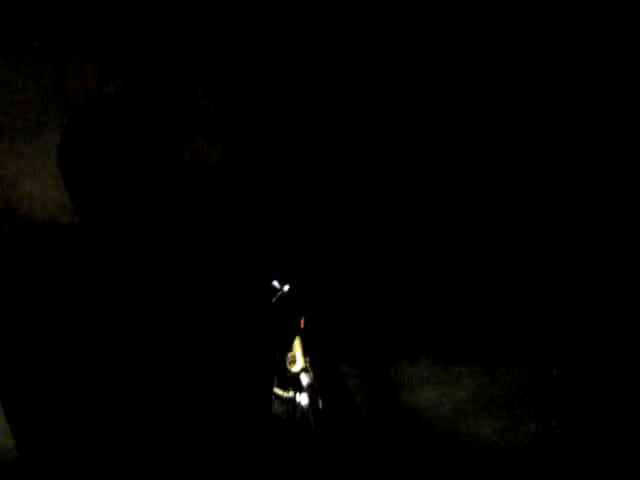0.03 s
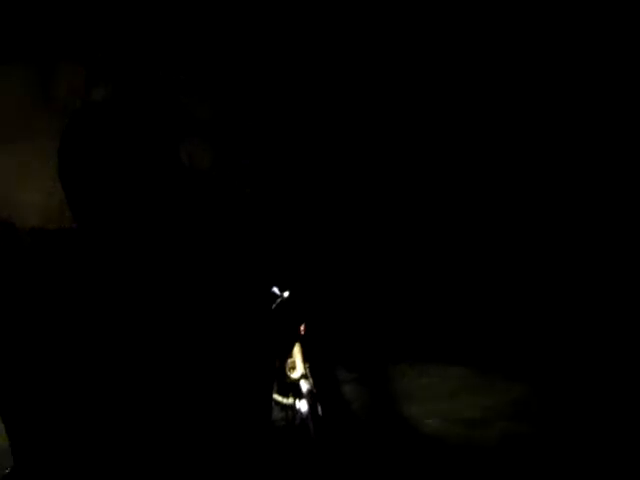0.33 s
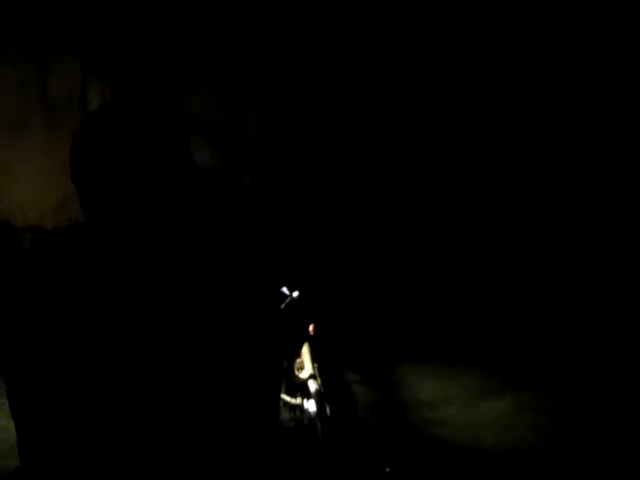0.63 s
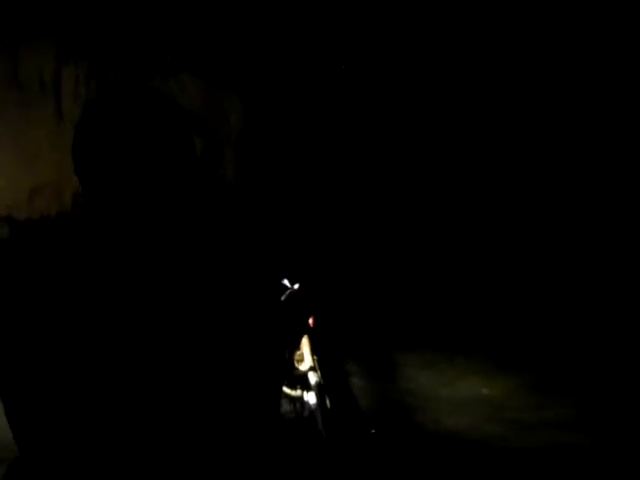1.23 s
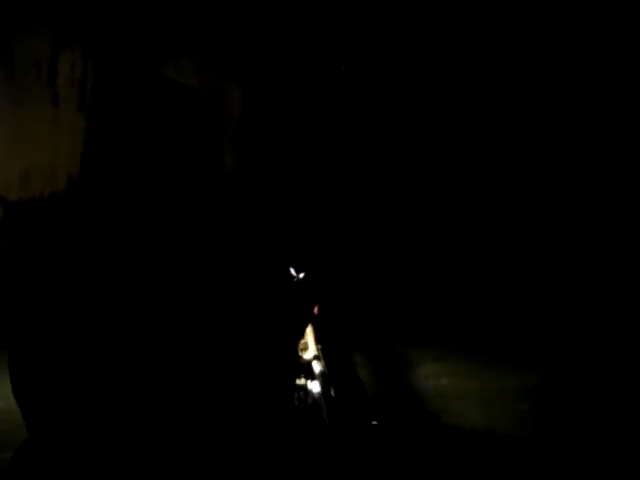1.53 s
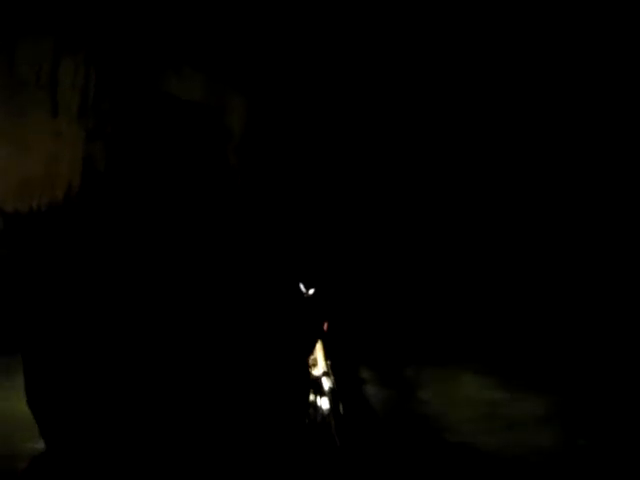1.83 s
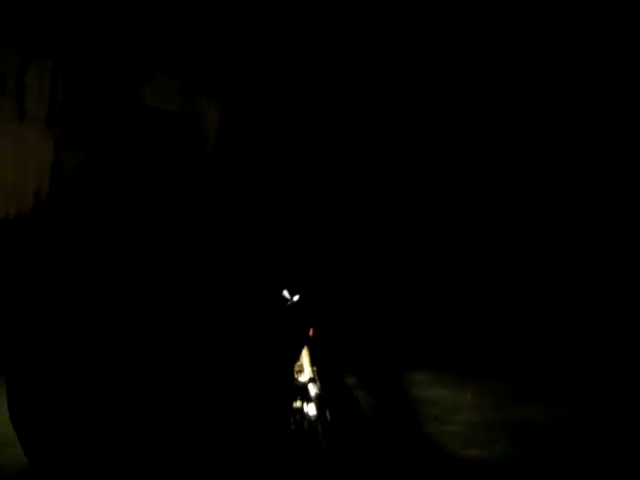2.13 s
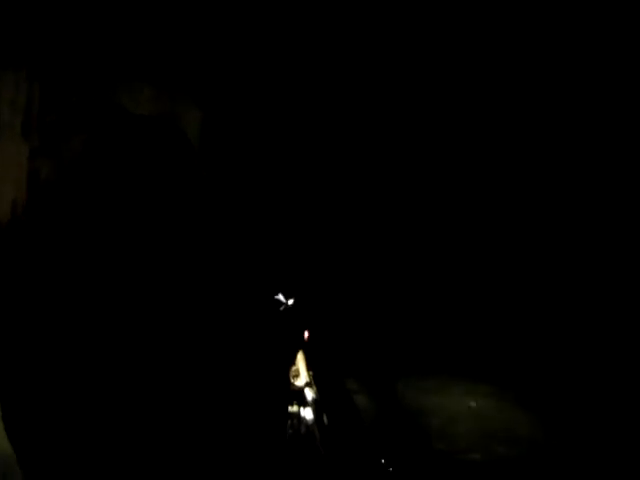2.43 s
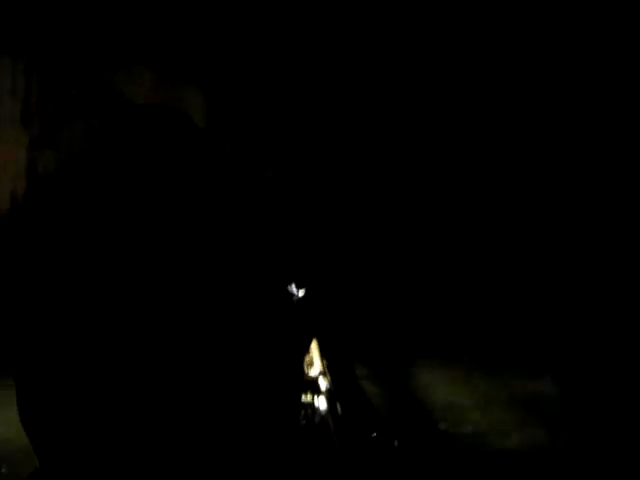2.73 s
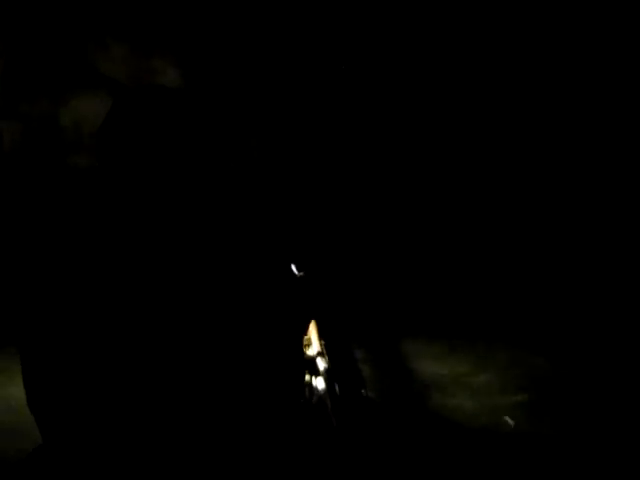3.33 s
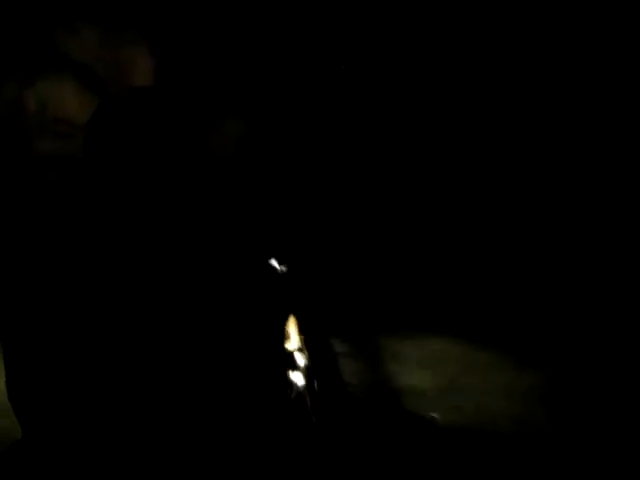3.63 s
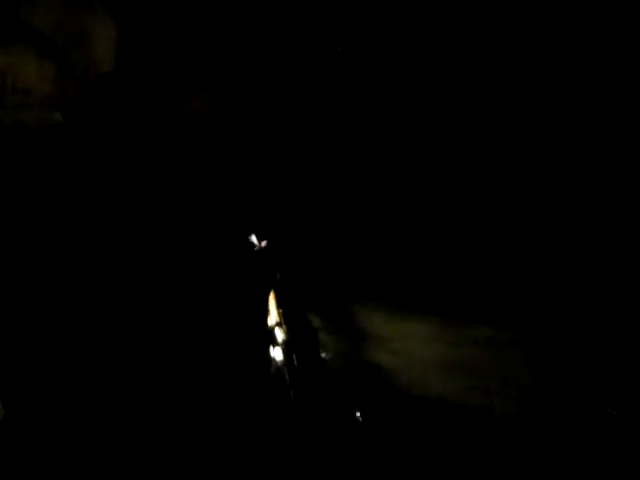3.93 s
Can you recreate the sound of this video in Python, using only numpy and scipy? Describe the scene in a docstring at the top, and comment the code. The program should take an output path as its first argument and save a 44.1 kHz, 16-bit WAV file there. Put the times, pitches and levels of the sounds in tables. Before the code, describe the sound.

Bats squeaking and chattering over a steady rush of water in an echoing cave.

```python
"""Inside a cave a steady rush, like running water, echoes off the rock while a colony of bats squeaks and chatters.
Wings flutter close to the microphone early on, a few drips tick on stone, and a hollow tone sinks near the end.
The mono recorder has a narrow notch in the treble and ducks its gain under the loudest squeaks."""
import sys
import numpy as np
from scipy import signal
from scipy.fft import rfft, irfft, next_fast_len
from scipy.io import wavfile
from scipy.ndimage import uniform_filter1d, map_coordinates

SR = 44100
rng = np.random.default_rng(int(sys.argv[2]) if len(sys.argv) > 2 else 0)


def waveform_to_disk(signal):
    """Save audio, clipped to [-1, 1], as 16-bit WAV at the path in sys.argv[1]."""
    frames = np.transpose(np.atleast_2d(signal))
    scaled = np.clip(frames, -1, 1) * 32767
    samples = np.round(scaled).astype(np.int16)
    wavfile.write(sys.argv[1], SR, samples)


N = 176400

# bat squeaks (s, length s, first pitch Hz, last pitch Hz, level dB, overtone dB, rasp 0-1)
SQUEAKS = [
    (0.265, 0.047, 7980, 9350, -21, -4.5, 0.6), (0.273, 0.026, 10400, 10800, -26, -23, 0.5),
    (0.408, 0.11, 5770, 5780, -25, -16, 0.39), (.487, .06, 9430, 9900, -27, -25, 0.6),
    (0.685, 0.079, 6350, 7270, -25, -9, 0.56), (0.702, 0.053, 15100, 13600, -28.5, -30, .55),
    (0.772, 0.036, 13900, 14100, -22.5, -30, .05), (0.83, 0.065, 10500, 10500, -24.5, -17, 0.4),
    (0.917, .066, 6480, 6400, -26.5, -12, 0.53), (.953, 0.033, 8400, 8700, -25, -25, .2),
    (.977, 0.042, 10050, 10500, -22.5, -28, 0.3), (1.031, 0.043, 7640, 8270, -17, -4, 1),
    (1.138, 0.1, 8180, 9840, -21.5, -18, 0.67), (1.18, 0.022, 18000, 15200, -20, -13, 0.6),
    (1.246, 0.078, 8400, 10030, -25.5, -26, 0.6), (1.381, .05, 7280, 5920, -23.5, -18, .8),
    (1.41, .06, 14000, 13600, -40, -30, .3), (1.495, 0.063, 4950, 5210, -25, -11, 0.3),
    (1.535, 0.052, 5303, 5440, -23.5, -4.5, .25), (1.675, 0.037, 9250, 8930, -27, -25, 0.5),
    (1.84, 0.065, 9700, 10000, -25.5, -25, 0.6), (1.91, 0.044, 7400, 8300, -26.5, -1, 0.6),
    (1.948, 0.036, 6900, 5870, -23, -7, .95), (2.032, 0.026, 6450, 6330, -25.5, -7, 0.4),
    (2.115, .07, 9200, 9600, -27, -25, 1), (2.162, .095, 6020, 6190, -22.5, -10, 0.46),
    (2.298, 0.1, 6140, 6740, -27, -10, .86), (2.451, 0.17, 6900, 7230, -24.5, -10, 0.72),
    (2.467, 0.017, 14000, 12700, -22.5, -30, 0.9), (2.635, 0.051, 8900, 9400, -11, -10, 0.57),
    (2.739, .048, 9160, 9130, -18, -8, 0.63), (2.75, 0.042, 7170, 6540, -20.5, -9, 0.48),
    (2.801, .05, 9060, 9050, -13.5, -11.5, 0.65), (2.883, .101, 6630, 6430, -26.5, -4, 0.5),
    (3.092, 0.084, 6400, 6680, -23.5, -26, 0.43),
    (3.286, 0.087, 7500, 7850, -27, -17, .6), (3.289, 0.099, 5960, 6164, -27.5, -20, 0.6),
    (3.469, 0.058, 11340, 10150, -27, -34, 1), (3.464, 0.042, 7380, 7500, -26, -4, 0.5),
    (3.603, 0.079, 9460, 9150, -25.5, -27, 0.33),
    (3.665, 0.063, 10950, 10580, -20.5, -25, 0.64), (3.699, 0.022, 6060, 7550, -19, -10, 0.85),
    (3.71, 0.029, 9230, 8720, -14, -8, 0.67),
    (3.763, 0.022, 15100, 11500, -31, -20, .95), (3.805, 0.038, 5800, 6970, -19.5, -10, 1),
    (3.815, 0.053, 16000, 16400, -18, -20, 0.84)]
SWOOP, EDGE, WAVER, WAVER_RATE = 2.1, 0.53, 0.0145, 160  # pitch easing, envelope roundness, pitch waver and its knots a second
TRILL_HZ, TRILL_DEPTH, TRILL_SWEEP, RASP_SPREAD = 334, 0.74, 0.04, 0.0607  # pulsing inside a raspy squeak
ECHO_DB, NEAR_DB, DRIER = -3, -22, 0.12  # echo of a squeak at NEAR_DB; dB less echo for each dB louder
CAVE = [(500, 1.2), (5000, 1.05), (9000, 0.92), (15000, 0.41)]  # (Hz, t60 s)
COLONY_DB, COLONY_LOW_HZ, COLONY_HIGH_HZ = -35, 5400, 7675  # distant squeaks
# the rush (s, level dB)
FLOW = [(.1, -29.5), (.25, -24), (.5, -23.5), (1.1, -22.5), (1.5, -24.5), (1.85, -23), (2.05, -23.5), (2.6, -23), (2.9, -24), (3.05, -24), (3.3, -23), (3.65, -22.5), (4, -21.5)]
# (Hz, dB per Hz)
RUSH = [(25, -46), (70, -39), (120, -14.5), (180, -11.5), (260, -5), (400, -2), (600, -1), (800, 0), (1200, 0), (2000, -3), (3200, -5), (4500, -5), (7000, -6), (11000, -10.5), (16000, -21)]
# level of the colony's blurred chatter (s, dB)
CHATTER_LEVEL = [(.1, -34), (.35, -29.5), (.55, -32), (.95, -21), (1.35, -22), (1.65, -33), (1.88, -42), (2.0, -30.5), (2.3, -25.5), (2.6, -28.5), (2.95, -23), (3.22, -29.5), (3.43, -33), (3.65, -26.5), (4, -20.5)]
CHATTER = [(3000, -38), (4300, 1), (5300, 6.5), (6800, 6), (9200, 4.5), (10500, 0), (12000, -12), (15000, -16)]  # (Hz, dB per Hz)
HOLLOW_HZ, HOLLOW_WIDTH_HZ = 582, 87  # a hollow resonance in the rush
HOLLOW = [(.1, -44), (1.48, -39), (1.56, -31.5), (1.65, -39), (2.8, -37.5), (3.05, -35), (3.3, -33), (3.45, -40), (3.63, -34), (3.86, -35), (3.96, -28.5)]  # (s, dB)
WINGBEATS = [(0.384, -32), (.523, -31), (.62, -25), (.665, -28), (.73, -34), (.775, -33), (1.06, -35), (1.575, -40)]  # (s, peak dB)
WING_HZ, WING_S = 77, 0.0048  # the push of air and its half-width
DRAUGHT = [(.1, -62), (.4, -51), (.7, -47), (1.2, -49), (1.8, -58), (2.6, -61), (3.1, -75), (4, -69)]  # stirred air on the microphone (s, dB)
AIR = [(20, 3.5), (60, 0), (120, 2), (250, -11), (600, -55)]  # (Hz, dB per Hz)
DRIPS = [(0.3796, 4040, -7, 0.0039), (2.1187, 2890, -13, .006), (2.4013, 4180, -8, 0.0072)]  # (s, Hz, peak dB, t60 s)
SPLASH_DB, SPLASH_HZ = -37.5, 1492  # countless small splashes
NOTCH_HZ, NOTCH_WIDTH_HZ = 7893, 540
LIMIT_DB, LIMIT_SLOPE, SENSE_HZ, ATTACK_S, RELEASE_S = -16.5, 0.8, 9330, 0.0066, 0.0084  # gain control
START_S = .097
TOP_HZ = 15850  # fixed
# arched twitters, heard by their high harmonics (s, length s, first pitch Hz, last pitch Hz, arch Hz, level dB)
TWITTERS = [(0.416, .044, 1900, 1810, 95, -32), (0.456, .042, 1780, 1600, 39.8, -26), (.568, .048, 1620, 1850, 25, -31),
            (1.554, 0.049, 2070, 2050, 60, -36), (2.535, .065, 1990, 2100, 68.6, -36)]
TWITTER_SCRATCH = .014  # fast pitch jitter
TWITTER_HZ, TWITTER_WIDTH_HZ = 13160, 3100  # the resonance that picks out those harmonics
# level of the highest treble of the colony (s, dB)
SIZZLE_LEVEL = [(.1, -33), (.38, -39), (.47, -35), (1.0, -27.5), (1.55, -30), (1.88, -49), (1.96, -32), (2.1, -32.5), (2.42, -27), (2.95, -29.5), (3.26, -41), (3.36, -35), (3.43, -46), (3.5, -30.5), (4, -27)]
CHATTER_PATCHY_DB = 2.3  # fixed
SIZZLE = [(9500, -29), (12500, -2), (15500, 1)]  # (Hz, dB per Hz)
# thin far whistles that hang in the cave (s, length s, Hz, level dB)
WHISTLES = [(1.55, 0.47, 5460, -36), (3.1, 0.4, 5490, -34.5), (3.642, 0.18, 5600, -33)]
WHISTLE_WIDTH_HZ = 30
# brief surges of the rush (s, length s, centre Hz, level dB)
SURGES = [(1.797, 0.072, 1130, -29.5), (2.88, .07, 885, -31), (3.136, 0.056, 950, -31), (3.89, 0.052, 393, -31.5)]
SURGE_WIDTH = 0.18  # half-width over centre frequency
HOOT_S, HOOT_LENGTH_S, HOOT_FIRST_HZ, HOOT_LAST_HZ, HOOT_DB = 3.56, 0.212, 619, 527, -31  # a hollow tone that sinks


def amp(db):
    return 10 ** (np.asarray(db) / 20)


def unit(x):
    return x / np.sqrt(np.mean(x ** 2) + 1e-20)


def along(points, hz):
    """(Hz, value) points on a log axis."""
    f, v = np.transpose(points)
    return np.interp(np.log(hz + 1), np.log(f + 1), v)


def curve(rows):
    """One value per sample from (s, value) rows."""
    return np.interp(np.arange(N) / SR, *np.transpose(rows))


def wobble(rate, size=N):
    """A smooth random curve, rate knots a second."""
    return map_coordinates(rng.standard_normal(size // 8 + 8), [np.arange(size) * rate / SR], mode="mirror")


def add(track, s, x):
    """Mix x into the track at time s."""
    part = track[max(0, round(s * SR)):][:len(x)]
    part += x[:len(part)]


def filtered(x, response):
    """x times a response of frequency."""
    m = next_fast_len(N + SR // 2)
    return irfft(rfft(x, m) * response(np.fft.rfftfreq(m, 1 / SR)), m)[:N]


def noise(spectrum, patchy_db):
    """Coloured noise of rms 1 with patches of random gain."""
    z = signal.stft(rng.standard_normal(N), nperseg=512)[2]
    field = uniform_filter1d(uniform_filter1d(rng.standard_normal(z.shape), size=5, axis=0), size=10, axis=1)
    x = signal.istft(z * amp(patchy_db * unit(field)), nperseg=512)[1][:N]
    return unit(filtered(x, lambda hz: amp(along(spectrum, hz))))


def cave(x):
    """The rock's echo: a fresh tail whose treble dies first."""
    hz, t, z = signal.stft(rng.standard_normal(SR), SR, nperseg=256)
    tail = signal.istft(z * amp(-60 * t / along(CAVE, hz)[:, None]), SR, nperseg=256)[1]
    return signal.fftconvolve(x, tail / np.linalg.norm(tail))


def squeak(length, first_hz, last_hz, overtone_db, rasp, size=SR // 4):
    """A wavering whistle that swoops to its last pitch; rasp breaks it into fast swept pulses, then into a screech."""
    u = np.clip(np.arange(size) / SR / length, 0, 1)
    trill = 2 * np.pi * np.cumsum(TRILL_HZ * (1 + 0.14 * wobble(111, size))) / SR
    hz = last_hz + (first_hz - last_hz) * (1 - u) ** SWOOP
    hz = hz * (1 + WAVER * wobble(WAVER_RATE, size) + rasp * TRILL_SWEEP * np.sin(trill) + rasp ** 2 * RASP_SPREAD * wobble(1808, size))
    phase = 2 * np.pi * np.cumsum(hz) / SR
    pulses = 1 + np.clip(TRILL_DEPTH * rasp, 0, 1) * np.cos(trill)
    tone = np.sin(phase) + amp(overtone_db) * (2 * hz < SR / 2) * np.sin(2 * phase)
    return np.sqrt(2) * unit(pulses) * tone * np.abs(np.sin(np.pi * u)) ** EDGE


def bats():
    """The nearer animals; the louder a call, the less echo goes with it."""
    out = np.zeros(N)
    for s, length, first_hz, last_hz, db, overtone_db, rasp in SQUEAKS:
        call = amp(db) * squeak(length, first_hz, last_hz, overtone_db, rasp)
        add(out, s, amp(0.5) * call)
        add(out, s, amp(ECHO_DB - DRIER * (db - NEAR_DB)) * cave(call))
    return out


def colony(count=170):
    """A crowd of short far squeaks heard only as echo, over the blur of many more."""
    calls = np.zeros(N)
    for k, (when, pitch, glide, span) in enumerate(rng.random((count, 4))):
        hz = COLONY_LOW_HZ + pitch * (COLONY_HIGH_HZ - COLONY_LOW_HZ)
        call = squeak(0.0196 + 0.0407 * span, hz * (1 + .25 * (glide - .5)), hz, overtone_db=-13, rasp=0.37, size=SR // 14)
        add(calls, (k + when) / count * N / SR, call)
    far = amp(COLONY_DB) * unit(cave(calls)[:N])
    chatter = amp(curve(CHATTER_LEVEL) - 0.5) * noise(CHATTER, patchy_db=CHATTER_PATCHY_DB)
    return far + chatter + amp(curve(SIZZLE_LEVEL)) * noise(SIZZLE, patchy_db=6.5)


def stream(count=2400):
    """The rush of water with its small splashes and a hollow resonance."""
    t = np.arange(SR // 50) / SR
    splashes = np.zeros(N)
    for when, pitch, size in zip(rng.random(count), rng.standard_normal(count), rng.exponential(1, count)):
        hz = np.clip(SPLASH_HZ * np.exp(.7 * pitch), 300, 12000)
        add(splashes, when * N / SR, amp(4.6 * min(size, 4)) * np.sin(2 * np.pi * hz * t) * np.exp(-hz * t / 4.2))
    rush = amp(curve(FLOW) + 0.34 * wobble(18)) * noise(RUSH, patchy_db=0.75)
    hollow = unit(filtered(rng.standard_normal(N), lambda hz: 1 / (1 + ((hz - HOLLOW_HZ) / HOLLOW_WIDTH_HZ) ** 2)))
    return rush + amp(SPLASH_DB) * unit(splashes) + amp(curve(HOLLOW)) * hollow


def wings():
    """Soft pushes of air from passing wings, on an uneven draught."""
    out = amp(curve(DRAUGHT) + 1.8 * wobble(24.7)) * noise(AIR, patchy_db=3)
    t = np.arange(-SR // 20, SR // 20) / SR
    for s, db in WINGBEATS:
        add(out, s + t[0], -amp(db) * np.sin(2 * np.pi * WING_HZ * t) * np.exp(-np.abs(t) / WING_S))
    return out


def drips():
    """Short ticks of drops on stone."""
    out, t = np.zeros(N), np.arange(SR // 20) / SR
    for s, hz, db, t60 in DRIPS:
        add(out, s, amp(db - 60 * t / t60) * (np.sin(2 * np.pi * hz * t) + 0.33 * rng.standard_normal(len(t))))
    return out + amp(2) * cave(out)[:N]


def twitters(size=SR // 10):
    """Thin, nearly dry calls whose pitch rises and falls in an arch."""
    out = np.zeros(N)
    for s, length, first_hz, last_hz, arch_hz, db in TWITTERS:
        u = np.clip(np.arange(size) / SR / length, 0, 1)
        arch = np.abs(np.sin(np.pi * u))
        hz = (first_hz + (last_hz - first_hz) * u + arch_hz * arch) * (1 + TWITTER_SCRATCH * wobble(1260, size))
        partials = np.arange(5, 10)[:, None] * hz  # fixed
        tone = np.sin(2 * np.pi * np.cumsum(partials, axis=1) / SR) / (1 + ((partials - TWITTER_HZ) / TWITTER_WIDTH_HZ) ** 2)
        add(out, s, amp(db) * unit(tone.sum(axis=0)) * arch ** EDGE)
    return out + amp(-5) * cave(out)[:N]


def swell(length, hz, width_hz, size=SR * 3 // 4):
    """A narrow band of noise that rises and fades once."""
    t = np.arange(size) / SR
    band = irfft(rfft(rng.standard_normal(size)) / (1 + ((np.fft.rfftfreq(size, 1 / SR) - hz) / width_hz) ** 2), size)
    return unit(band) * np.abs(np.sin(np.pi * np.clip(t / length, 0, 1))) ** EDGE


def swells():
    """Hanging whistles, surges of the rush and one sinking hollow tone."""
    out = np.zeros(N)
    for s, length, hz, db in WHISTLES:
        add(out, s, amp(db) * swell(length, hz, WHISTLE_WIDTH_HZ))
    for s, length, hz, db in SURGES:
        add(out, s, amp(db) * swell(length, hz, SURGE_WIDTH * hz))
    u = np.clip(np.arange(SR // 2) / SR / HOOT_LENGTH_S, 0, 1)
    phase = 2 * np.pi * np.cumsum(HOOT_FIRST_HZ + (HOOT_LAST_HZ - HOOT_FIRST_HZ) * u) / SR
    add(out, HOOT_S, amp(HOOT_DB) * np.sqrt(2) * np.sin(phase) * np.abs(np.sin(np.pi * u)) ** EDGE)
    return out


def scene():
    mono = stream() + colony() + bats() + twitters() + wings() + drips() + swells()
    return np.array([mono, mono])


def lagged(x, seconds):
    """One-pole smoothing."""
    k = np.exp(-1 / (seconds * SR))
    return signal.lfilter([1 - k], [1, -k], x)


def record(dry):
    """One microphone: a treble notch, gain control most sensitive to treble, and a band limit."""
    x = filtered(dry.mean(axis=0), lambda hz: (NOTCH_HZ ** 2 - hz ** 2) / (NOTCH_HZ ** 2 - hz ** 2 + 2j * hz * NOTCH_WIDTH_HZ))
    sensed = filtered(x, lambda hz: np.sqrt(.5 + (hz / SENSE_HZ) ** 4))
    over_db = np.maximum(10 * np.log10(lagged(sensed ** 2, ATTACK_S) + 1e-12) - LIMIT_DB, 0)
    duck_db = LIMIT_SLOPE * np.maximum(lagged(over_db, 0.0064), lagged(over_db, RELEASE_S))
    out = filtered(x * amp(-duck_db) * (np.arange(N) / SR > START_S), lambda hz: hz < TOP_HZ)
    return np.array([out, out])


dry = scene()
out = record(dry)
waveform_to_disk(out)
```